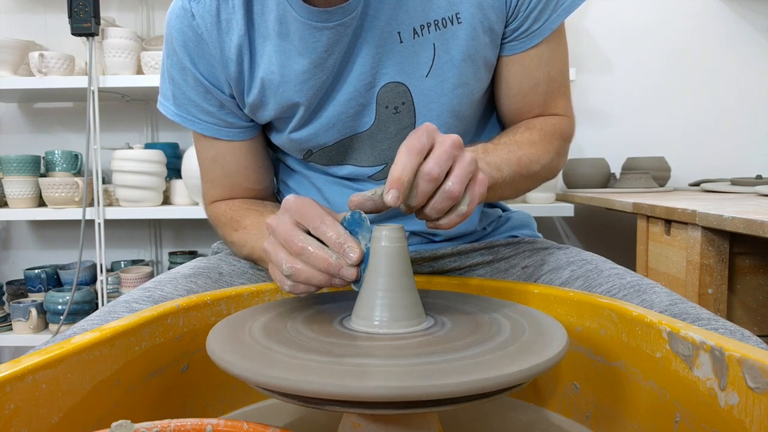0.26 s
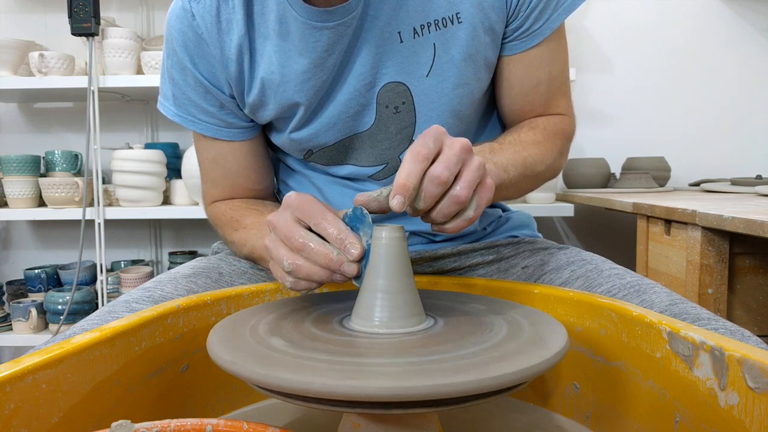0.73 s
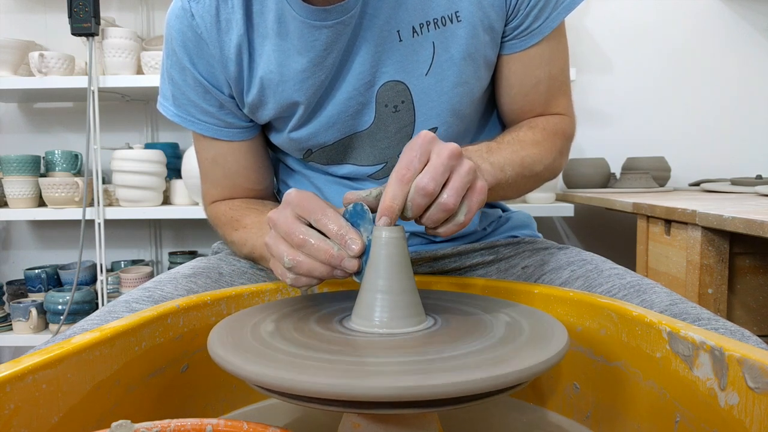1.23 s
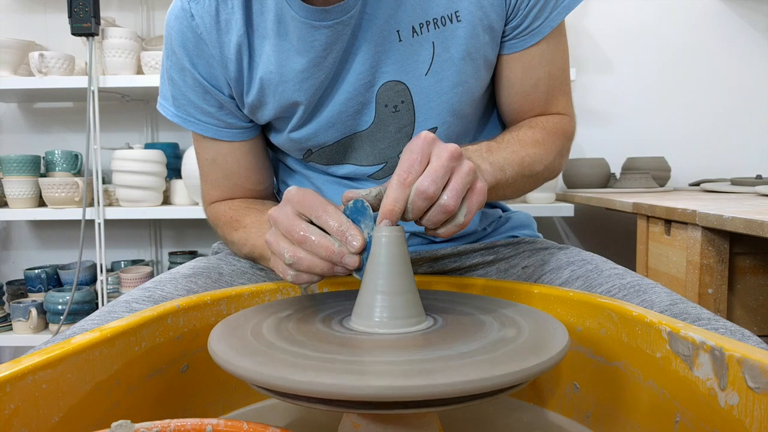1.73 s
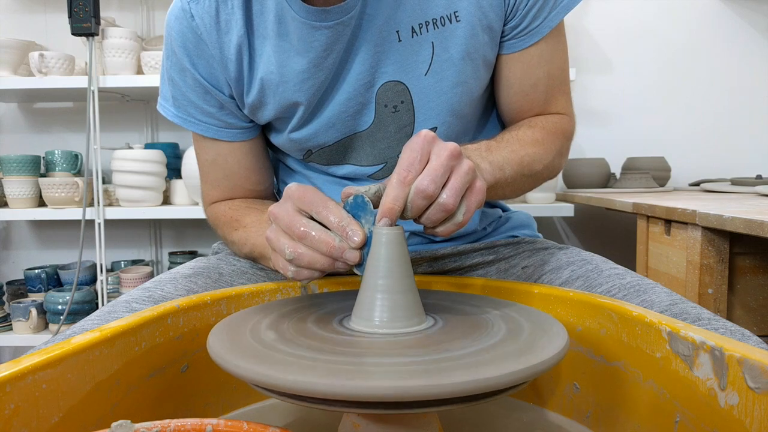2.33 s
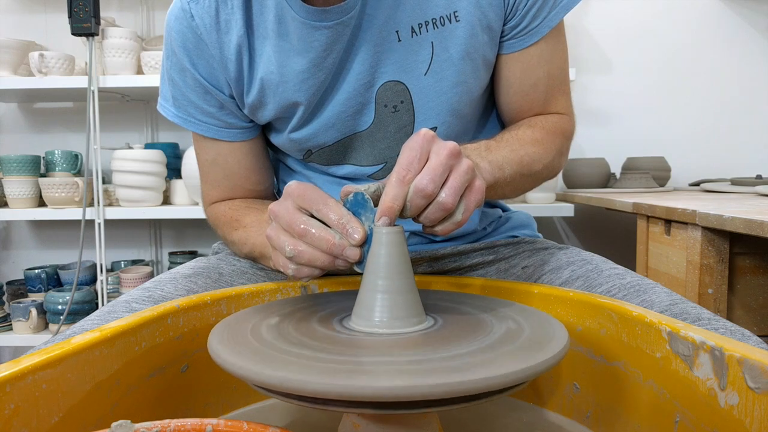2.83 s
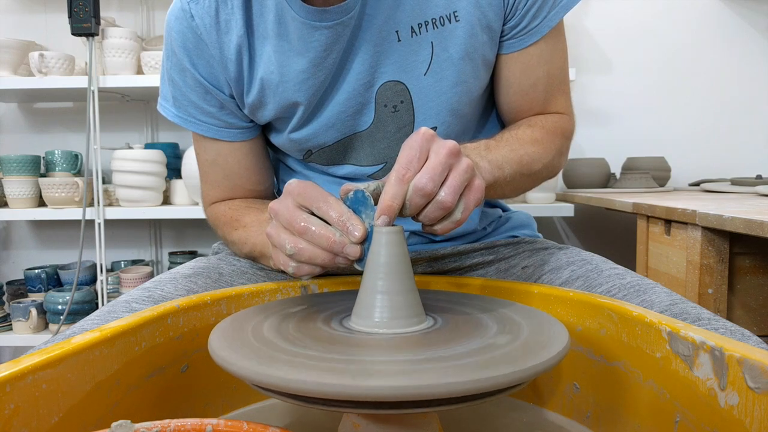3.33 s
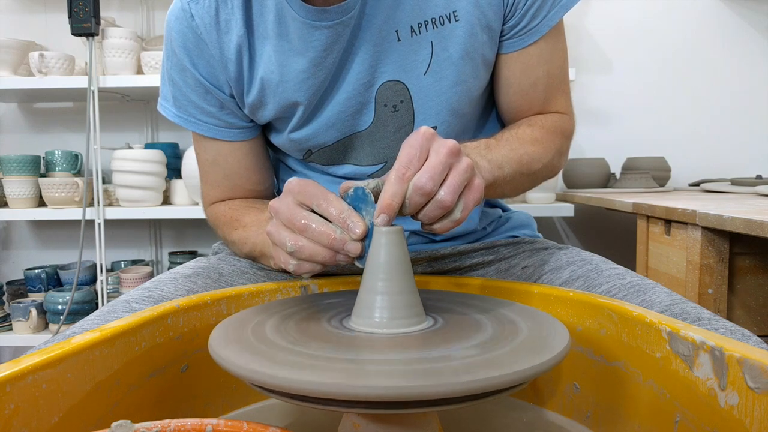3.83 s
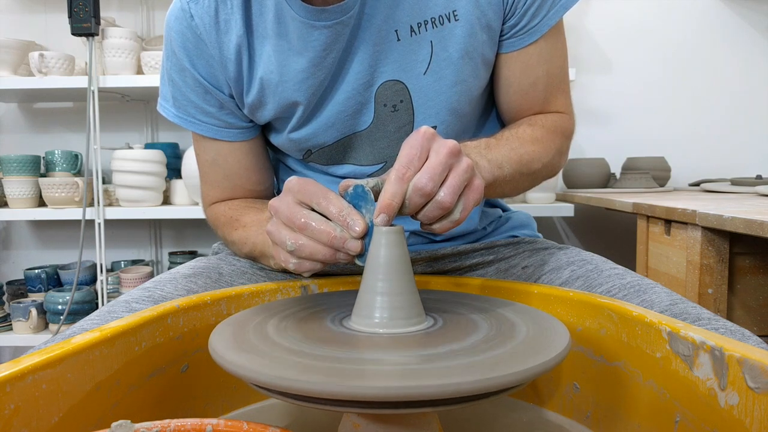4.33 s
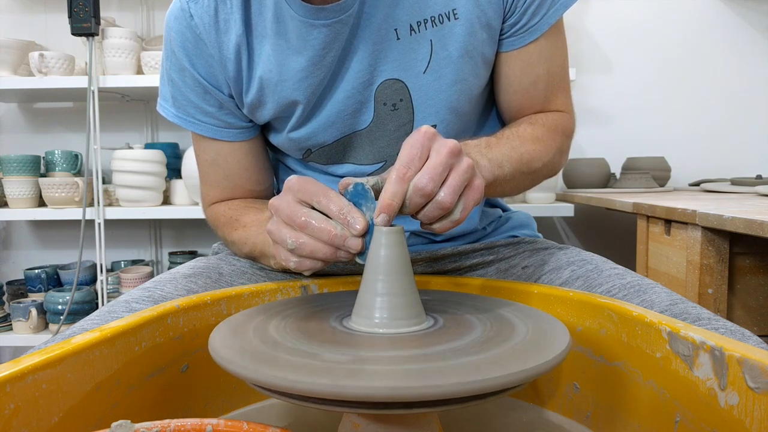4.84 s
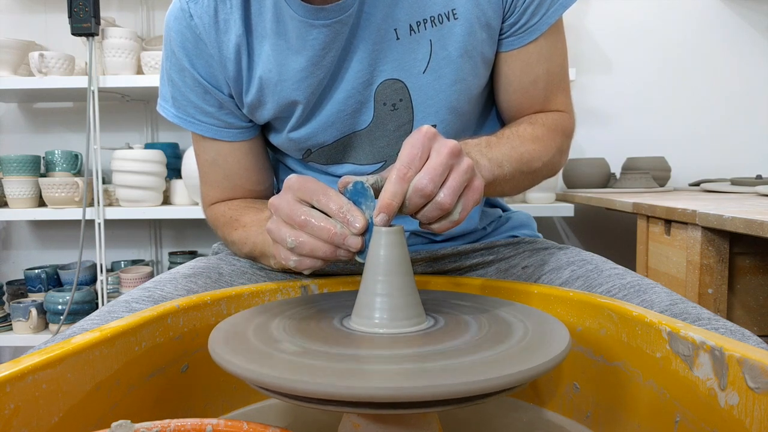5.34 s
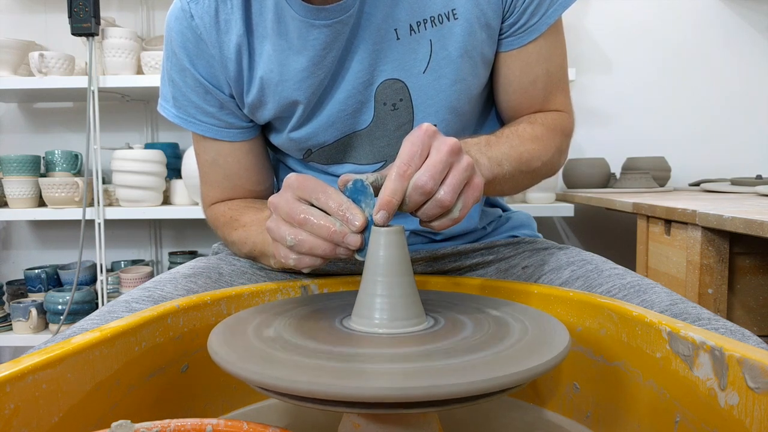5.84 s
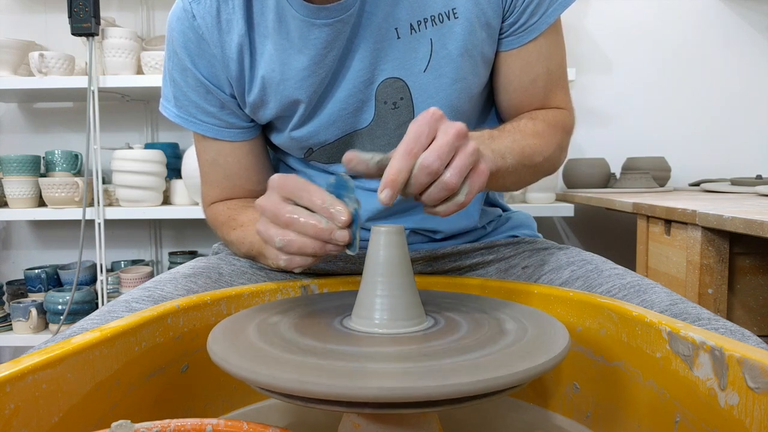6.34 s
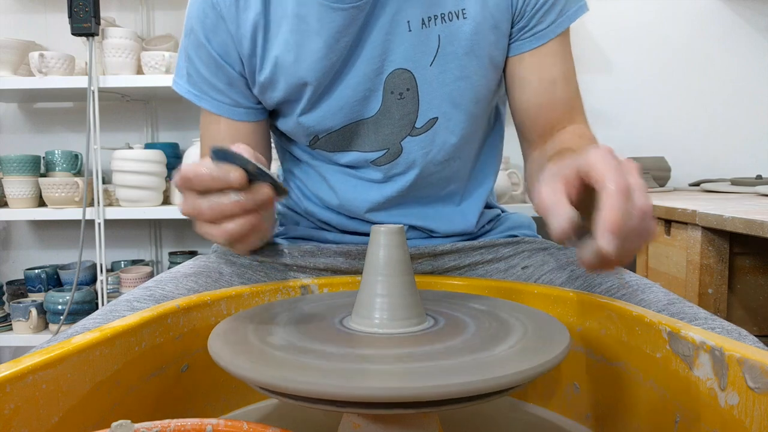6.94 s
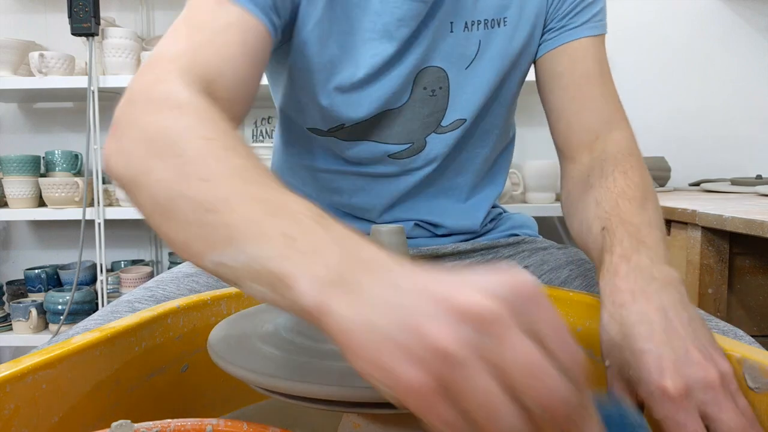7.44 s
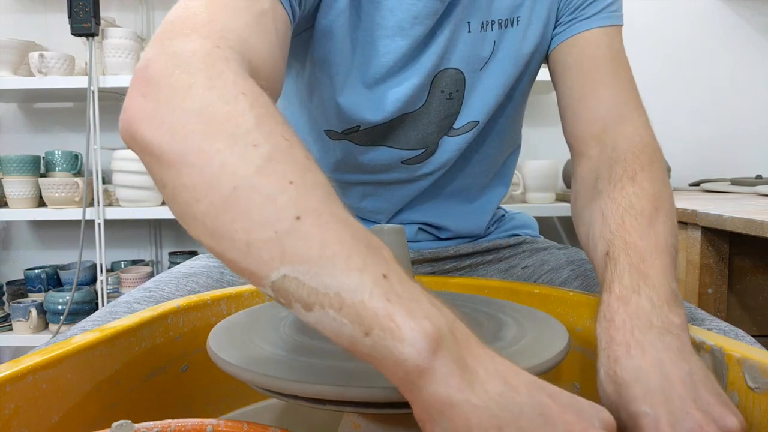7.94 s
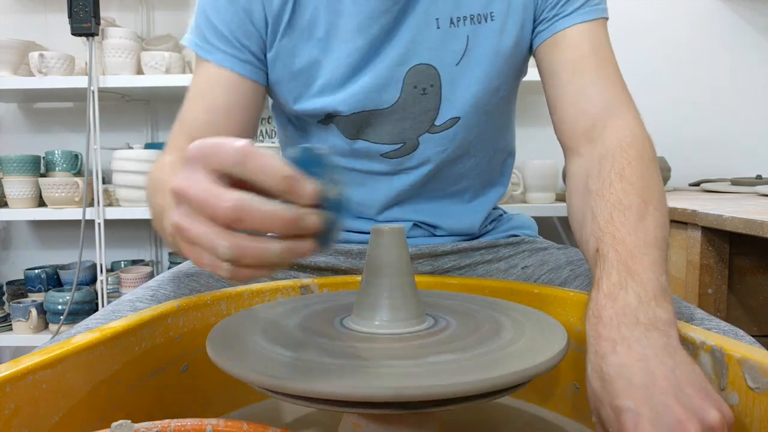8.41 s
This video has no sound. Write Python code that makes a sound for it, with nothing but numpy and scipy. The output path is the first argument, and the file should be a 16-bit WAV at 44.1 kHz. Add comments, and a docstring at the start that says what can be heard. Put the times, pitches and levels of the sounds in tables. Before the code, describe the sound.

Close to the microphone, a potter's wheel motor hums evenly in a small workshop, with faint wavering bearing tones and a thin hiss. A light, high rubbing swish and scuff repeats with the rotation, about three times every two seconds. Toward the end come two short clicks in quick succession, a faint one and then a sharper one, and the hum carries on.

```python
"""In a small studio an electric potter's wheel runs while a potter smooths clay, then leans over the pan.
Magnetic forces make the motor hum at twice the mains frequency; shaft and bearings add wavering tones,
rumble and hiss. Once a turn the wheel head rubs: friction gives swells of hiss and a scuff, and the
frame throbs in its lowest mode. Near the end the potter's body screens the motor, two specks tick
and a bump on the pan rocks the frame."""
import sys
import numpy as np
from scipy import signal
from scipy.fft import rfft, irfft
from scipy.io import wavfile

SR = 44100
rng = np.random.default_rng(int(sys.argv[2]) if len(sys.argv) > 2 else 0)


def wav_out(sig):
    """Save sig, one row per channel (or a flat mono array), as 16-bit PCM at SR to the path in sys.argv[1]."""
    wavfile.write(sys.argv[1], SR, np.round(np.clip(np.atleast_2d(sig).T, -1, 1) * 32767).astype(np.int16))


N = 382347
T = np.arange(N) / SR
FREQS = np.maximum(np.arange(N // 2 + 1) * SR / N, 1)
SHAFT_HZ, TURN_S = 23.62, .662  # motor speed, period of the wheel head


# fundamental of the hum, twice the mains frequency: (time [s], frequency [Hz])
HUM_PITCH = [(0, 99.86), (2.7, 99.9), (8.67, 99.96)]
# hum partials: (harmonic number, level [dB], change with hands clear [dB], change when screened [dB])
HUM_PARTIALS = [(1, -49.5, -0.5, -0.5), (2, -49, 0.5, 1), (3, -41.6, -1.5, -2), (4, -46.4, 0.6, -2),
                (5, -71.5, -3.7, 5), (6, -62, -4, 3.2), (7, -61, 0.9, -1), (8, -62, -7, -4),
                (9, -73, -6, -3), (10, -76.5, -2, -1), (11, -79, .7, -3), (12, -96, 1.3, -9),
                (13, -73.5, 2, -6), (14, -68.5, 0.5, -2), (15, -74, 2, 1.5), (16, -79.5, 5, -3),
                (17, -80.5, -3.4, -4)]
# distance of the hands from the clay: (time [s], distance [0 touching, 1 well clear])
HAND_DISTANCE = [(6.3, 0), (6.55, .55), (6.9, 0.41), (7.1, 1)]
# the potter's body in front of the motor: (time [s], screening [0-1])
BODY_SCREEN = [(6.95, 0.1), (7.2, 1), (7.55, .9), (7.68, 0.5), (7.9, 0.8), (8.04, 0.06), (8.2, 1), (8.5, 1),
               (8.67, .6)]

def motor_hum(dispersion_rad=.7, shake_rad=.013):
    """Magnetic forces vibrate the iron; rotor imbalance modulates the phase once a revolution."""
    phase = 2 * np.pi * np.cumsum(curve(HUM_PITCH)) / SR + shake_rad * np.sin(2 * np.pi * SHAFT_HZ * T)
    # arms and body shift the standing waves between motor and listener
    hands, screen = curve(HAND_DISTANCE), curve(BODY_SCREEN)
    out = 0
    for k, db, hands_db, screen_db in HUM_PARTIALS:
        # higher partials flutter more, and the frame delays them more
        flutter = (.042 + .09 * (k / len(HUM_PARTIALS)) ** 2) * walk(11)
        waver = .04 * walk(4.8)
        gain = undb(db + hands_db * hands + screen_db * screen) * (1 + flutter + waver)
        out = out + gain * np.cos(k * phase - dispersion_rad * k ** 2)
    return np.sqrt(2) * out


# rubbing patches on the head: (centre [turns], half width [turns], swish gain [dB], grit gain [dB])
RUB_PATCHES = [(.03, .07, -3, -3), (.17, .06, -8, -3), (.27, .04, -3, -30), (.51, 0.072, -2.5, 2.5),
               (.77, 0.17, 0, -5), (.94, 0.04, -14, 3)]

def patch_contact(base_swish_db=-12.5, base_grit_db=-21):
    """Incoherent sources add in power: each passing patch raises the gains of swish and grit."""
    swish_power, grit_power = undb(base_swish_db) ** 2, undb(base_grit_db) ** 2
    for centre, width, swish_db, grit_db in RUB_PATCHES:
        touch = np.exp(-(cycle_offset(T / TURN_S - centre) / width) ** 2)
        swish_power += touch * undb(swish_db) ** 2
        grit_power += touch * undb(grit_db) ** 2
    return np.sqrt(swish_power), np.sqrt(grit_power)


# resonances of the wheel head: (frequency [Hz], bandwidth [Hz], boost [dB])
HEAD_MODES = [(2011, 35, 3), (2651, 60, 3), (3108, 75, 4.5), (3717, 90, 5), (4043, 62, 5), (4510, 50, 4),
              (4614, 100, 3.5), (4933, 360, 5), (5483, 38, 7.5), (6043, 126, 3.5), (6817, 400, 4),
              (7767, 150, 2), (8882, 128, 2.7), (9850, 45, 4), (11778, 43, 4.5), (12909, 40, 4)]
# swish of the rubbing head at unit gain: (frequency [Hz], spectral level [dB per Hz])
SWISH_SPECTRUM = [(1800, -118), (3400, -111), (4400, -105), (5400, -100), (6100, -91.5), (6500, -90),
                  (7000, -99.5), (7700, -112), (9500, -125)]
# fine grit in the contact at unit gain: (frequency [Hz], spectral level [dB per Hz])
GRIT_SPECTRUM = [(1500, -120), (3400, -111.4), (4300, -104.3), (5300, -102.5), (7000, -96.5), (7700, -97.5),
                 (8200, -101.5), (9500, -104.3), (11000, -111.4), (15000, -119)]
# passes of the wheel's high spot: (time [s], scuff gain [dB], frame throb level [dB])
HIGH_SPOT_PASSES = [(.357, -1, -59), (1.022, -3, -55.5), (1.686, 9.5, -52), (2.346, 2, -56.5),
                    (3.005, 6, -56), (3.668, 6, -57), (4.333, 6, -55), (4.993, -6, -58), (5.662, 6, -56),
                    (6.32, -3, -57), (6.98, 5, -52.5), (7.64, 7, -55), (8.306, 0, -54)]

def head_rubbing(scuff_s=.0043, push_db=3.0):
    """Sliding friction excites the head's resonances, pulsing with each revolution of the motor."""
    swish_gain, grit_gain = patch_contact()
    pulse = np.exp(-(cycle_offset(SHAFT_HZ * T - .25) / .15) ** 4)
    push = undb(push_db * pulse + .97 * walk(16))
    scuffs = sum(undb(db) / (1 + ((T - s) / scuff_s) ** 2) for s, db, _ in HIGH_SPOT_PASSES)
    swish = slips(spread_db=1.3) * push * undb(.3) * swish_gain
    grit = slips(spread_db=2.5) * push * (grit_gain + scuffs)
    return colour(swish, SWISH_SPECTRUM, HEAD_MODES) + colour(grit, GRIT_SPECTRUM, HEAD_MODES)


# the potter bumps the pan: (time [s], frame throb level [dB])
PAN_BUMPS = [(8.11, -53.5)]

def frame_throb(mode_hz=59.2, wander_hz=2.37, floor_db=-67, lag_s=.005, attack_s=.04, decay_s=.23):
    """Damped vibration: each pass of the high spot and each bump excites the frame's lowest mode."""
    power = undb(floor_db) ** 2
    for s, *_, db in list(HIGH_SPOT_PASSES) + list(PAN_BUMPS):
        age = np.maximum(T - s - lag_s, 0)
        rise = np.minimum(age / attack_s, 1)
        decay = np.exp(-np.maximum(age - attack_s, 0) / decay_s)
        power += (undb(db) * rise * decay) ** 2
    phase = 2 * np.pi * np.cumsum(mode_hz + wander_hz * walk(9.6)) / SR
    return np.sqrt(2 * power) * undb(1.5 * walk(12)) * np.sin(phase)


# impacts of hard specks: (time [s], peak level [dB])
SPECK_HITS = [(7.793, -40), (8.1082, -31.3)]
# ringing of a tick: (frequency [Hz], relative level [dB], 60 dB decay time [s])
SPECK_MODES = [(6190, -3, .005), (6650, 0, .004), (7950, -2, .0028), (10800, -13, .0015)]

def speck_ticks(rise_s=.00015):
    """Impact excitation: a hard speck sets heavily damped modes ringing."""
    out = 0
    for s, db in SPECK_HITS:
        age = np.maximum(T - s, 0)
        ring = sum(undb(mode_db - 60 * age / t60) * np.sin(2 * np.pi * hz * age)
                   for hz, mode_db, t60 in SPECK_MODES)
        ring *= 1 - np.exp(-age / rise_s)
        out = out + undb(db) * ring / np.abs(ring).max()
    return out


# running noise of the drive: (frequency [Hz], spectral level [dB per Hz])
RUMBLE_SPECTRUM = [(20, -86), (32, -99), (50, -85), (85, -80.5), (130, -91.5), (170, -86), (240, -85.5),
                   (300, -87), (420, -89.5), (500, -91.5), (650, -90), (850, -95.5), (1550, -93),
                   (2100, -135)]

def drive_rumble(repeat=.29, lean_s=7.1, shadow_hz=960, shadow_width_hz=420, shadow_db=-7.5):
    """Noise partly repeating each revolution is comb filtered; the leaning body shadows its midrange."""
    feedback = repeat * np.exp(-2j * np.pi * FREQS / SHAFT_HZ)
    clatter = irfft(rfft(rng.standard_normal(N)) / (1 - feedback), N)
    clatter /= clatter.std()
    shadowed = colour(clatter, RUMBLE_SPECTRUM, [(shadow_hz, shadow_width_hz, shadow_db)])
    return np.where(T < lean_s, colour(clatter, RUMBLE_SPECTRUM), shadowed)


# harmonics of the shaft's rotation: (harmonic number, level [dB])
SHAFT_HARMONICS = [(3, -67), (9, -74), (10, -76), (12, -70), (25, -76), (26, -74), (27, -76.5)]
# tones of bearings and housing, with sidebands of the hum spaced by the shaft speed: (frequency [Hz], level
# [dB])
DRIVE_TONES = [(115.1, -68), (123.8, -65.5), (143.3, -65), (323.7, -69), (522.9, -78.5), (543.7, -70.5),
               (722.7, -73), (732.1, -75.5), (755.7, -77.5), (975.7, -79), (1037, -77.5), (1144, -77),
               (1222.7, -84.5), (1275, -77.5), (1370, -75), (1486.5, -73), (1512, -81), (1534, -73),
               (1798.7, -90), (2006.6, -84), (2100.8, -81.5), (2223.3, -87), (2266.4, -85.5),
               (2455.5, -82.5), (2643.9, -78.5), (2738.8, -84), (4201, -78), (4602, -75), (6608, -71.5)]

def drive_whine(slip_rad=.039, flicker_db=3.0):
    """Forced vibration: the shaft sounds harmonics of its speed; bearings, housing and the hum's shaft-rate
    sidebands add faint wavering tones."""
    angle = 2 * np.pi * SHAFT_HZ * T + slip_rad * walk(2.2)
    out = sum(undb(db) * np.sin(k * angle + rng.uniform(0, 2 * np.pi)) for k, db in SHAFT_HARMONICS)
    for hz, db in DRIVE_TONES:
        pitch = hz + (.94 + .000833 * hz) * walk(6.36)
        out += undb(db + flicker_db * walk(8)) * np.sin(2 * np.pi * np.cumsum(pitch) / SR)
    return np.sqrt(2) * out


# steady hiss of the bearings: (frequency [Hz], spectral level [dB per Hz])
HISS_SPECTRUM = [(1200, -115), (1800, -99), (2300, -95), (2850, -96.5), (3400, -99.8), (4300, -97),
                 (5300, -96.5), (6200, -96), (7000, -90.5), (7700, -97), (8200, -100.6), (9500, -103.8),
                 (11000, -105.5), (15500, -107.3)]

def bearing_hiss():
    """Broadband friction noise from the bearings is filtered by the head's resonances."""
    return colour(slips(spread_db=1.2), HISS_SPECTRUM, HEAD_MODES)


def splash_pan(x, echo_db=-9, t60_s=.12):
    """Early reflections from the plastic pan form a dense, exponentially decaying impulse response."""
    response = rng.standard_normal(N) * undb(-60 * T / t60_s)
    echoes = signal.fftconvolve(x, response / np.linalg.norm(response))[:N]
    return (x + undb(echo_db) * echoes) / np.hypot(1, undb(echo_db))


def slips(spread_db, size=24):
    """Friction as dense tiny slips: noise of rms 1 with a random level every `size` samples."""
    x = rng.standard_normal(N)
    x *= np.repeat(undb(spread_db * rng.standard_normal(N // size + 1)), size)[:N]
    return x / x.std()


def colour(x, spectrum, resonances=()):
    """Source and filter: give white noise of rms 1 a spectrum with Lorentzian peaks or dips."""
    hz, db = np.transpose(spectrum)
    db = np.interp(np.log(FREQS), np.log(hz), db)
    for centre, width, peak in resonances:
        db += peak / (1 + (2 * (FREQS - centre) / width) ** 2)
    return irfft(rfft(x) * undb(db), N) * np.sqrt(SR / 2)


def walk(cutoff_hz):
    """Slow random fluctuation: low-passed noise with standard deviation 1."""
    x = irfft(rfft(rng.standard_normal(N)) / (1 + (FREQS / cutoff_hz) ** 4), N)
    return x / x.std()


def cycle_offset(cycles):
    """Phase wrapping: signed distance to the nearest whole cycle."""
    return (cycles + .5) % 1 - .5


def curve(rows):
    """Linear interpolation of rows (time [s], value)."""
    return np.interp(T, *np.transpose(rows))


def undb(db):
    """Decibels to amplitude ratio."""
    return 10 ** (np.asarray(db) / 20)


def scene():
    """Superposition of the wheel's sources, heard close by in mono."""
    machine = motor_hum() + drive_whine() + drive_rumble() + frame_throb()
    contacts = head_rubbing() + speck_ticks() + bearing_hiss()
    return (machine + splash_pan(contacts))[None]


def record(dry, cutoff_hz=15750):
    """Band limiting: an elliptic low-pass cuts the top steeply."""
    return signal.sosfilt(signal.ellip(10, .1, 80, cutoff_hz, fs=SR, output="sos"), dry)


dry = scene()
out = record(dry)
wav_out(out)
```